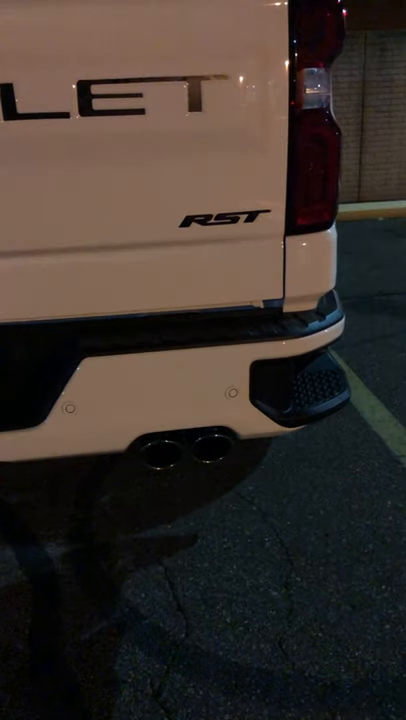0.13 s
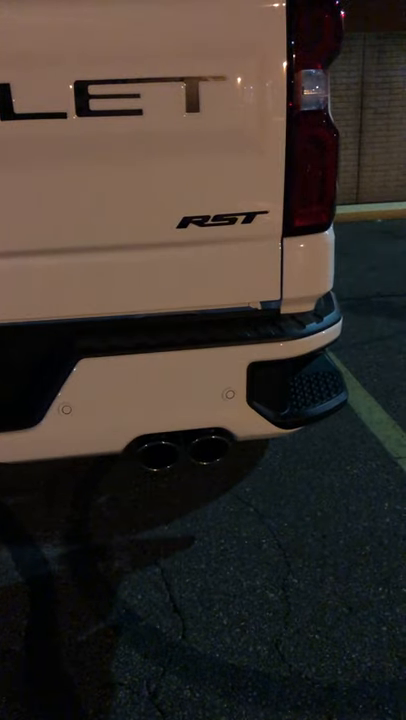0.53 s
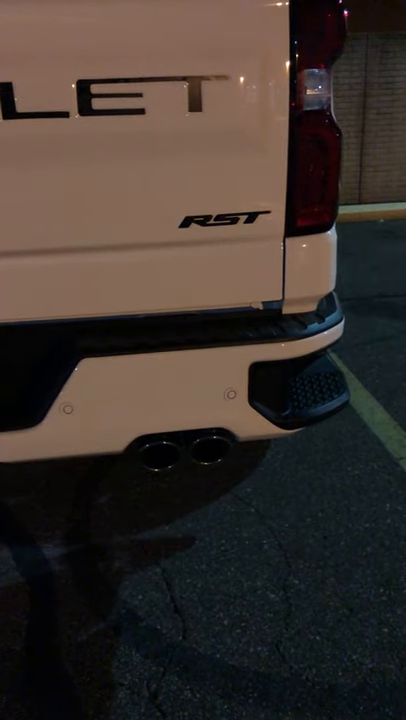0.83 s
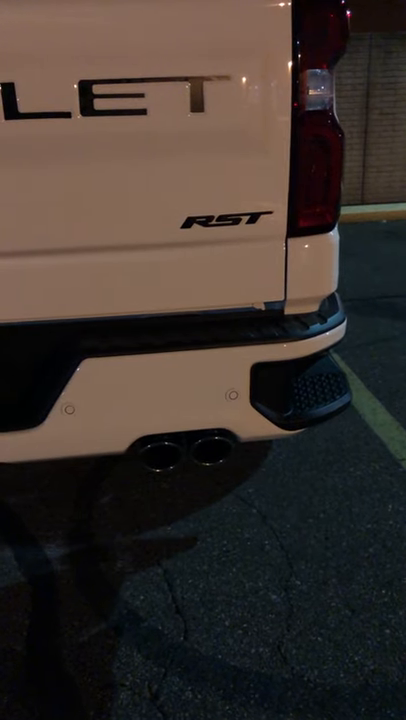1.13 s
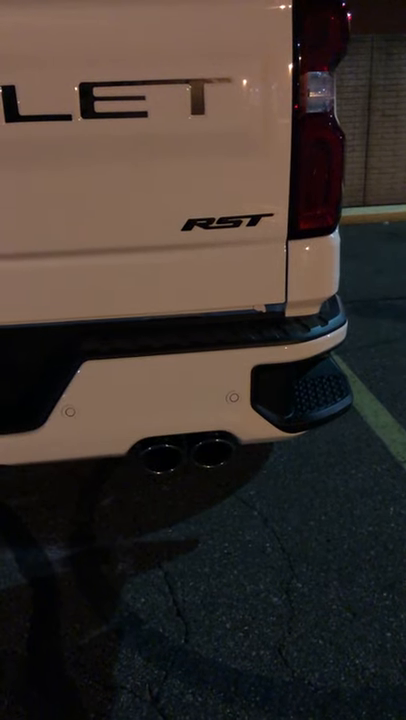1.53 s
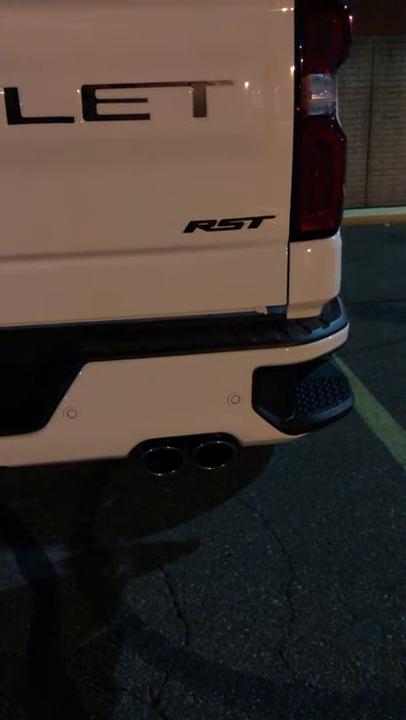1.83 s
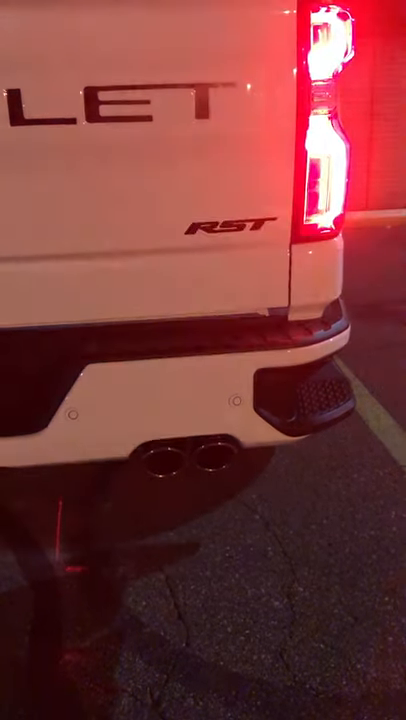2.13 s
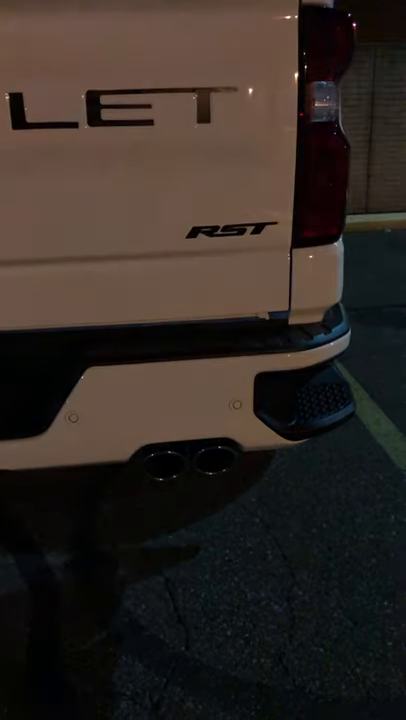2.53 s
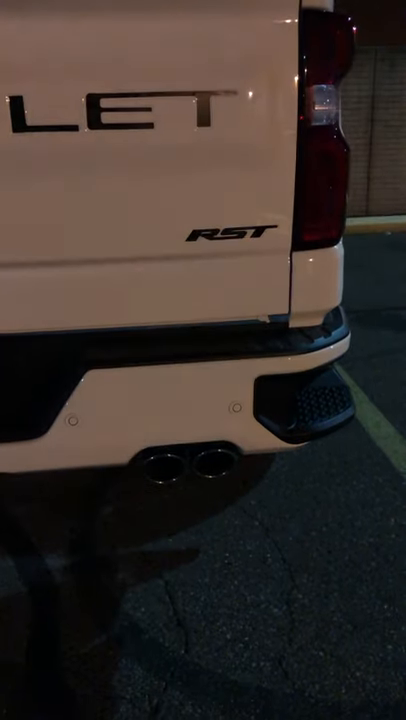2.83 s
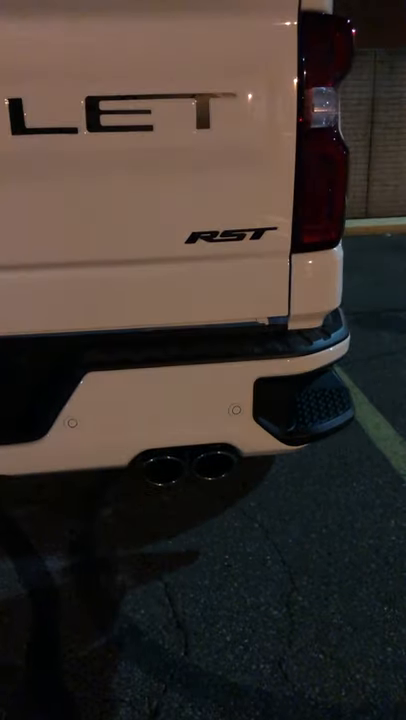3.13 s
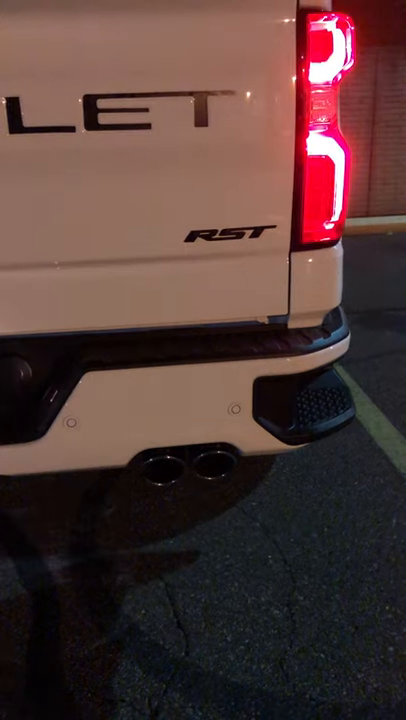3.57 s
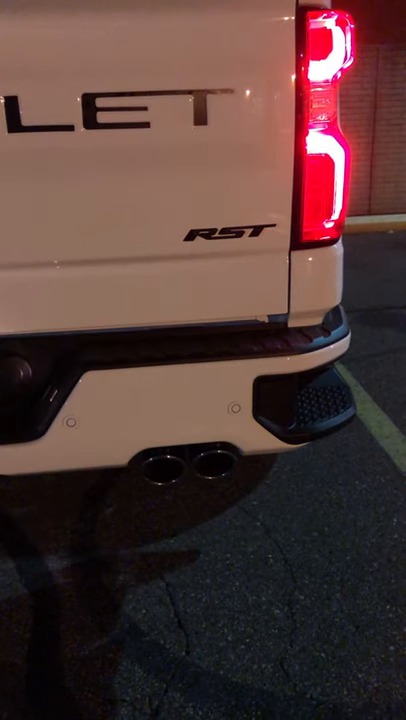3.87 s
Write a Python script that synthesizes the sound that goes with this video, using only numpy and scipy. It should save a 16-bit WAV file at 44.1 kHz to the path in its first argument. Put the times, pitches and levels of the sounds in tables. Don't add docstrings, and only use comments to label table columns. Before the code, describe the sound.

A truck's big engine starts: quiet distant traffic and tiny grit ticks, a faint electric pump whirr, a short grinding starter whine, then a sudden loud, raspy exhaust roar, close to the microphone in an open night car park.

```python
import sys
import numpy as np
from scipy import signal
from scipy.io import wavfile

SR = 44100
rng = np.random.default_rng(int(sys.argv[2]) if len(sys.argv) > 2 else 0)


def magnitude_from_level(level_db):
    exponent = np.asarray(level_db, float) / 20
    return 10 ** exponent


def master(y):
    cut = np.clip(np.atleast_2d(y).T, -1, 1)
    pcm = np.round(cut * 32767)
    wavfile.write(sys.argv[1], SR, pcm.astype(np.int16))


N = 176400
t = np.arange(N) / SR

# start_s, level_db, attack_s, hold_s, fall_db_per_s
STROKES = [
    (2.686, -37.5, 0.019, 0.027, 160),
    (2.775, -45, 0.086, 0.058, 90),
    (3.013, -41, 0.0092, 0.039, 221),
    (3.115, -41, 0.0073, 0.042, 258),
    (3.203, -39.5, 0.0074, 0.017, 260),
    (3.276, -39, 0.0097, 0.03, 220),
]
# time_s, cycle_rate_hz, firing_strength_db
ENGINE = [
    (3.349, 11.0, -19),
    (3.362, 11.4, -3.5),
    (3.385, 11.7, -0.5),
    (3.40, 12.0, 4),
    (3.43, 12.3, 5),
    (3.5, 12.28, 5.5),
    (3.6, 12.28, 2.5),
    (3.74, 12.28, 1),
    (4, 12.28, 1.4),
]
# start_s, peak_db
POPS = [(3.351, -27), (3.3835, -15), (3.394, -18), (3.4087, -12), (3.4291, -7), (3.457, -8), (3.488, -13),
        (3.54, -15), (3.583, -17)]


def rms_one(x):
    return x / np.sqrt(np.mean(x ** 2) + 1e-20)


def in_time(rows):
    s, *columns = np.transpose(rows)
    return [np.interp(t, s, column) for column in columns]


def drift(rate_hz):
    r = np.exp(-2 * np.pi * rate_hz / SR)
    wander = signal.lfilter([1], [1, -2 * r, r * r], rng.standard_normal(N + SR))
    return rms_one(wander[SR:])


FLICKER = drift(10.8)


def coloured(spectrum, patchy_db):
    out, edges = 0, 20 * 2 ** np.arange(0, 10, .5)
    white = rng.standard_normal((2, N))
    hz, db = np.transpose(spectrum)
    for k, (low, high) in enumerate(zip(edges, edges[1:])):
        level_db = np.interp(np.log(low * high) / 2, np.log(hz), db, left=-70)
        sos = signal.butter(2, [low, high], "band", fs=SR, output="sos")
        band = signal.sosfilt(sos, white[k % 2])
        out = out + magnitude_from_level(level_db + patchy_db * np.roll(FLICKER, 9001 * k)) * band
    return rms_one(out)


def peak(x, hz, width_hz):
    r = np.exp(-np.pi * width_hz / SR)
    poles = [1, -2 * r * np.cos(2 * np.pi * hz / SR), r * r]
    return signal.lfilter([(1 - r * r) / 2, 0, (r * r - 1) / 2], poles, x)


def hum(hz, width_hz):
    return rms_one(peak(peak(rng.standard_normal(N), hz, width_hz), hz, width_hz))


def body(x, peaks):
    out = 0
    for k, (hz, width_hz, db) in enumerate(peaks):
        out = out + (-1) ** k * magnitude_from_level(db) * peak(x, hz, width_hz) * np.sqrt(SR / width_hz) / 2
    return out


def ring(clicks, hz, t60_s):
    r, w = magnitude_from_level(-60 / (t60_s * SR)), 2 * np.pi * hz / SR
    return signal.lfilter([0, np.sin(w)], [1, -2 * r * np.cos(w), r * r], clicks + 1e-18)


def puffs(times_s, gains, fall_s):
    clicks = np.zeros(N + SR)
    np.add.at(clicks, (np.asarray(times_s) * SR).astype(int), gains)
    return signal.lfilter([1], [1, -np.exp(-1 / (fall_s * SR))], clicks[:N] + 1e-18)


def traffic():
    # time_s, rumble_db
    swell = [
        (0, -49),
        (1.5, -48),
        (2.1, -47),
        (2.6, -48),
        (3.3, -43),
        (4, -35),
    ]
    # pitch_hz, level_db
    wash = [(25, -16), (59, -1.5), (175, -2.5), (260, -14), (558, -25.5), (903, -23.5), (1760, -33),
            (7680, -49.5), (15000, -53.5)]
    level_db, = in_time(swell)
    passing = magnitude_from_level(-46) * np.exp(-((t - 2.33) / 0.69) ** 2)
    return magnitude_from_level(level_db) * coloured(wash, patchy_db=1.5) + passing * hum(59.4, 28)


def grit():
    # start_s, peak_db, pitch_hz
    ticks = [(0.0793, -68, 5700), (0.0712, -71, 7500), (0.3435, -62, 3300), (0.3458, -69, 4450),
             (0.35, -64, 2600), (0.368, -66, 4300), (0.466, -63, 3000), (0.474, -62, 3150),
             (0.7994, -67, 4530), (1.115, -62, 4440), (1.3085, -60, 6500), (1.671, -72, 5000),
             (2.006, -68, 3500)]
    # pitch_hz, level_db, t60_s
    pebble = [(2100, -37, .014), (3250, -42, .008), (5000, -41, .005), (7300, -49, .004)]
    tick_t60_s = 0.035
    white = rng.standard_normal(N)
    out = np.zeros(N)
    for hz, db, t60_s in pebble:
        out += ring(puffs([.3386], [magnitude_from_level(db) / 2], 1 / SR), hz, t60_s)
    for s, db, hz in ticks:
        snap = puffs([s], [magnitude_from_level(db - 1)], tick_t60_s / np.log(1000)) * white
        out += ring(puffs([s], [magnitude_from_level(db) / 4], 1 / SR), hz, tick_t60_s / 2)
        out += 5.0 * peak(snap, hz, .15 * hz)
        out += 1.6 * peak(snap, 1.55 * hz, .2 * hz)
        out += 1.6 * peak(snap, hz, .9 * hz)
    return out


def pump():
    # pitch_hz, level_db_per_hz
    rush = [(700, -24), (1140, -14), (1500, -9.5), (1800, -13), (2300, -8.5), (4700, -11), (5600, -18),
            (12000, -32)]
    # pitch_hz, level_db
    motor_lines = [(1135, -73), (1704, -78), (5810, -80)]
    # pitch_hz, width_hz, level_db
    whirr = [(1717, 40, -68.5), (1830, 90, -65.5), (1926, 71, -70), (3517, 31, -73.5), (4440, 120, -73.5),
             (4850, 330, -75)]
    on_s, rise_s, rush_db, surge_db, settle_s = 2.15, 0.064, -61.5, 4.0, .08
    tones = 0
    for hz, db in motor_lines:
        tones = tones + magnitude_from_level(db) * np.sqrt(2) * np.sin(2 * np.pi * hz * t + 1.3 * drift(2.3))
    for hz, width_hz, db in whirr:
        tones = tones + magnitude_from_level(db) * hum(hz, width_hz)
    on = np.clip((t - on_s) / rise_s, 0, 1)
    filling_db = surge_db * np.exp(-np.maximum(t - on_s - rise_s, 0) / settle_s)
    return on * magnitude_from_level(rush_db + filling_db) * coloured(rush, patchy_db=1.0) + on ** 3 * tones


def stroke_load():
    surges = []
    for s, db, rise_s, hold_s, fall in STROKES:
        falling_db = db - fall * np.maximum(t - s - rise_s - hold_s, 0)
        surges.append(magnitude_from_level(falling_db) * np.clip((t - s) / rise_s, 0, 1) ** 2)
    return np.max(surges, axis=0)


def shaft_groan():
    tones_hz, tones_db = [1314, 1064], [-9.5, -9.5]
    starts_s = np.array(STROKES)[:, 0]
    since_s = t - starts_s[np.maximum(np.searchsorted(starts_s, t) - 1, 0)]
    pitch = 1 - 1.8 * np.clip(since_s, 0, .1) + 0.03036 * drift(59.7)
    angle = 2 * np.pi * np.cumsum(pitch) / SR
    out = 0
    for hz, db in zip(tones_hz, tones_db):
        out = out + magnitude_from_level(db + 2.3 * np.roll(FLICKER, hz * 9)) * np.sin(hz * angle)
    return out * (t > STROKES[2][0])


def gear_grind():
    # pitch_hz, level_db
    scrape = [(200, 6), (400, -16), (650, -20), (1200, 5.5), (2300, -16.5), (4000, -6.5), (9000, -16.5),
              (15500, -31)]
    # pitch_hz, width_hz, level_db
    housing = [(411, 57, -8), (761, 21.4, -12), (983, 41, -7.5), (1370, 16, -7), (1677, 4.2, -9),
               (1918, 29, -12.5), (2110, 41, -10.5), (2295, 34, -12), (2636, 58, -11), (3513, 34, -11),
               (3960, 54, -15.5), (4830, 190, -16), (6030, 44, -13.5), (7700, 530, -14.5)]
    unevenness_db = 1.1 * rng.exponential(1, N // 20 + 1).repeat(20)[:N]
    teeth = rng.standard_normal(N) * magnitude_from_level(unevenness_db)
    grind = rms_one(coloured(scrape, patchy_db=1.5) + 1.3 * rms_one(body(teeth, housing)))
    late = np.clip((t - STROKES[3][0]) / .1, 0, 1)
    spit = coloured([(4000, -5), (7000, 2), (11000, -7), (15500, -14)], patchy_db=2.0)
    return grind + late * magnitude_from_level(-15) * spit


def brushes_and_mesh():
    # pitch_hz, level_db
    brush = [(700, -1), (2300, -35), (2800, -2), (5280, -6.5), (9510, -28), (15500, -34)]
    # time_s, mesh_hz, level_db
    mesh = [(2.74, 600, -62), (2.81, 870, -54), (2.86, 1030, -52), (2.9, 1060, -51), (2.96, 950, -55),
            (3.0, 900, -66), (3.085, 1020, -64), (3.105, 1100, -52), (3.125, 1190, -52), (3.14, 1060, -68),
            (3.175, 1090, -56), (3.19, 1200, -51), (3.215, 1270, -51), (3.235, 1170, -68),
            (3.25, 1200, -50), (3.295, 1360, -52), (3.303, 1215, -66), (3.33, 1330, -50), (3.36, 1450, -51),
            (3.41, 1500, -68)]
    # multiple_of_mesh, level_db
    orders = [(1, 5), (2.7, -2), (3.3, -2), (4, 2), (5, -7), (6, -6), (7, -6), (8, -12), (10, -20),
              (12, -19), (2.4, -5), (3.7, -4), (4.5, -7), (5.6, -8), (6.6, -9), (9.2, -17)]
    hz, db = in_time(mesh)
    phase = 2 * np.pi * np.cumsum(hz * (1 + .013 * drift(143))) / SR
    breaks_db = 4 * np.clip(drift(70), -2, 1.5)
    slow = np.clip((3.06 - t) / 0.059, 0, 1)
    whine = 0
    for i, (multiple, order_db) in enumerate(orders):
        depth = .5 if multiple in (1, 4) else 1
        heard = 1 if i in (3, 7, 9) else slow
        level = magnitude_from_level(order_db + depth * np.roll(breaks_db, 7001 * i))
        whine = whine + heard * level * np.sin(multiple * phase)
    on = np.clip((t - STROKES[0][0]) / 0.015, 0, 1) * np.clip((mesh[-1][0] - t) / 0.011, 0, 1)
    return on * (magnitude_from_level(-51.5) * coloured(brush, patchy_db=1.5) + magnitude_from_level(db) * whine)


def starter():
    return stroke_load() * (gear_grind() + shaft_groan()) + brushes_and_mesh()


def pipe_notes(shots_s, bank, strength):
    # pitch_hz, t60_s, gain_from_bank_0, gain_from_bank_1
    pipes = [(58, .28, -.082, -.141), (96.5, .28, -.002, .075), (138.6, .28, .041, .037),
             (176, .28, -.089, -.001), (259, .3, -.029, .023), (318.8, .28, -.02, .011),
             (403.4, .17, -.083, .03), (417.6, .15, .047, -.009), (461, .2, .004, -.027),
             (541, .28, .032, .006)]
    out = np.zeros(N)
    for hz, t60_s, first, second in pipes:
        clicks = np.zeros(N + SR)
        clicks[(shots_s * SR).astype(int)] = strength * np.where(bank > .5, second, first)
        out += ring(clicks[:N], hz, t60_s)
    return out


def tip_rasp(hiss_gate, pops, cracks, turns):
    # pitch_hz, width_hz, level_db
    tips = [(663, 30, -11), (970, 120, -7.5), (1010, 140, -7), (1137, 20, -12), (1395, 43, -14.5),
            (1552, 33, -15), (1910, 560, -32), (2366, 60, -17), (2578, 71, -16), (3575, 82, -18),
            (4200, 600, -19), (5820, 160, -25)]
    # pitch_hz, width_hz, level_db
    throat = [(920, 300, -5), (1420, 230, -5), (2260, 440, -12)]
    repeat_share = .6
    habit = rng.standard_normal(3590)[(turns % 1 * 3590).astype(int)]
    white = repeat_share * habit + np.sqrt(1 - repeat_share ** 2) * rng.standard_normal(N)
    snaps = puffs([s for s, db in POPS], [magnitude_from_level(db - 5) for s, db in POPS], .00016)
    rasp = body((magnitude_from_level(-30) * hiss_gate + .1 * pops) * white + 5 * cracks, tips)
    return rasp + body(.8 * peak(pops * white, 1300, 2500) - 3 * snaps, throat)


def tip_bark(shots_s, fired, crack_db, force_db):
    # pitch_hz, level_db, t60_s
    bark = [(945, -26, .07), (1040, -26, .07), (1550, -32, 0.048), (2360, -37, .05), (2600, -36, .05)]
    out = np.zeros(N)
    for hz, db, t60_s in bark:
        chance_db = 2.15 * rng.standard_normal(len(shots_s))
        gains = fired * magnitude_from_level(db + .6 * crack_db + chance_db + np.minimum(force_db, 0))
        out += ring(puffs(shots_s, gains, 1 / SR), hz, t60_s)
    return out


def exhaust_gush(hiss_gate, pops, running, force_db):
    # pitch_hz, level_db
    gush = [(350, -50), (600, 2.5), (953, -2), (1270, -6), (2370, -8.5), (3030, -15), (3570, -19),
            (15500, -33)]
    steady = running * magnitude_from_level(1.8 * np.maximum(force_db, 1))
    level = magnitude_from_level(-38) * (.5 * hiss_gate + steady) + .025 * pops
    return level * coloured(gush, patchy_db=1.0)


def engine():
    # bank, header_delay_ms, strength_db, crack_db
    cylinders = [(0, .22, -6, -11), (1, 2.79, -.1, -11), (0, .92, 6, 2.5), (1, .62, 3.8, -.5),
                 (1, 1.52, -2.9, -9), (0, 1.38, 3.8, -9), (1, 1.83, 6, -3), (0, 1.66, -.9, -7)]
    uneven_db, jitter_ms, rasp_follows = 1.4, .12, 1.3
    rate_hz, force_db = in_time(ENGINE)
    turns = np.cumsum(rate_hz) / SR
    turns = turns - np.interp(3.959, t, turns)

    count = np.arange(-80, 5)
    bank, delay_ms, strength_db, crack_db = np.array(cylinders)[count % 8].T
    chance = rng.standard_normal((len(count), 3))
    shots_s = np.interp(count / 8, turns, t) + (delay_ms + jitter_ms * chance[:, 0]) / 1000
    fired = shots_s > ENGINE[0][0]
    shot_force_db = np.interp(shots_s, t, force_db)
    strength = fired * magnitude_from_level(strength_db + shot_force_db + uneven_db * chance[:, 1])
    uneven_crack_db = crack_db + uneven_db * chance[:, 2]

    running = np.clip((t - ENGINE[0][0]) / 0.0066, 0, 1)
    hiss_gate = puffs(shots_s, fired * magnitude_from_level(uneven_crack_db + rasp_follows * shot_force_db), 0.0064)
    hiss_gate = hiss_gate + 0.22 * running * magnitude_from_level(rasp_follows * force_db)
    pops = puffs([s for s, db in POPS], [magnitude_from_level(db + 3) for s, db in POPS], 0.0045)
    cracks = -puffs(shots_s, fired * magnitude_from_level(uneven_crack_db - 24), .0001)

    out = pipe_notes(shots_s, bank, strength)
    out += tip_rasp(hiss_gate, pops, cracks, turns)
    out += tip_bark(shots_s, fired, crack_db, shot_force_db)
    out += exhaust_gush(hiss_gate, pops, running, force_db)
    out += ring(puffs([3.378], [magnitude_from_level(-8) / 100], .0018), 62, .25)
    shell = [(46.2, 92, -7.0), (169, 69, -2.5), (401, 54, 0.5), (527.7, 22, -1.5)]  # Hz, width Hz, dB
    rumble = rms_one(body(rng.standard_normal(N), shell))
    return out + magnitude_from_level(-23 + force_db) * running * rumble


def wall_echoes(roar):
    # delay_s, level_db
    walls = [
        (.023, -10),
        (.047, -11),
        (.081, -6),
    ]
    upper = signal.sosfilt(signal.butter(2, [700, 5000], "band", fs=SR, output="sos"), roar)
    return sum(magnitude_from_level(db) * np.r_[np.zeros(int(lag_s * SR)), upper][:N] for lag_s, db in walls)


def scene():
    roar = engine()
    return (traffic() + grit() + pump() + starter() + roar + wall_echoes(roar))[None]


def band_limit(x):
    return signal.sosfilt(signal.butter(12, 15780, fs=SR, output="sos"), x)


def record(dry):
    dry = signal.sosfilt(signal.butter(2, 38, "high", fs=SR, output="sos"), dry)
    rounded = 0.78 * np.tanh(dry / 0.8)
    mix = signal.sosfilt(signal.butter(2, 13000, fs=SR, output="sos"), rounded)
    return band_limit(mix)


dry = scene()
out = record(dry)
master(out)
```